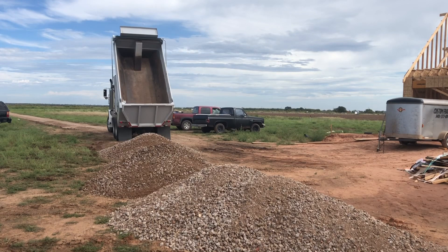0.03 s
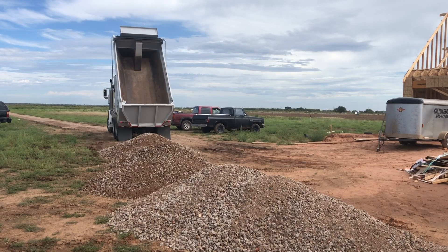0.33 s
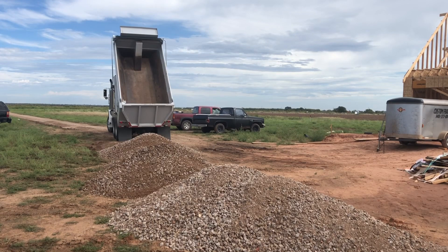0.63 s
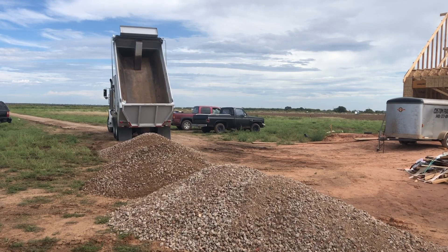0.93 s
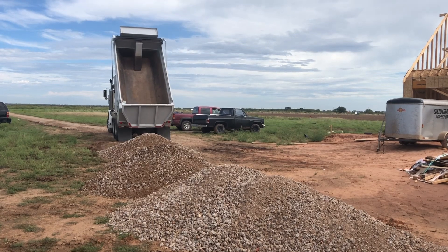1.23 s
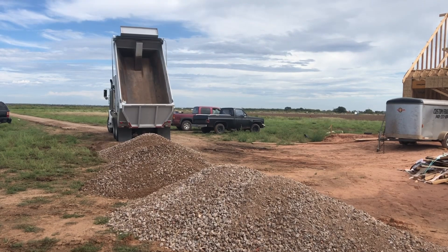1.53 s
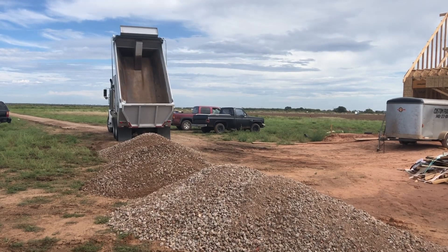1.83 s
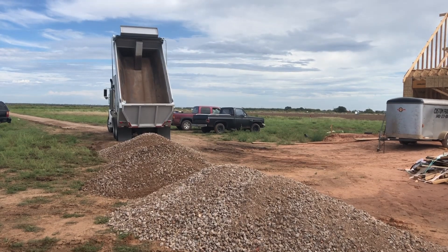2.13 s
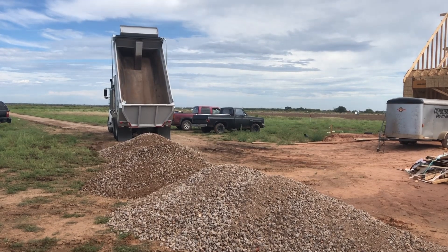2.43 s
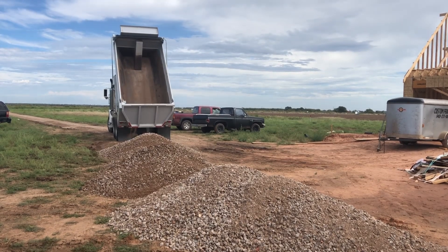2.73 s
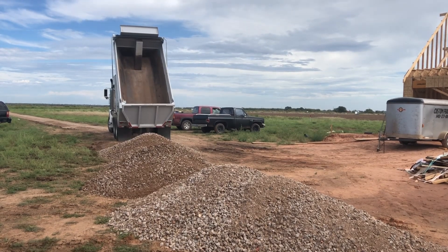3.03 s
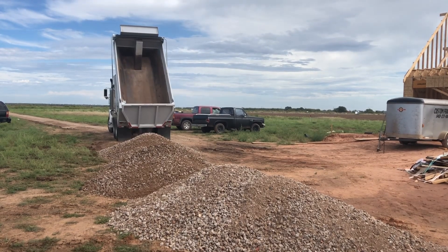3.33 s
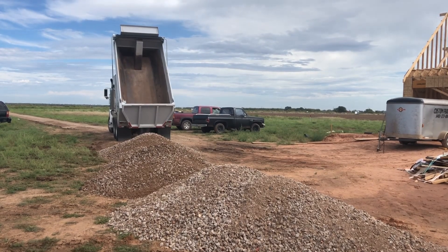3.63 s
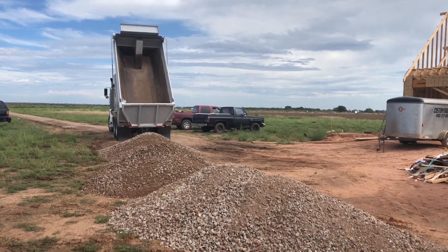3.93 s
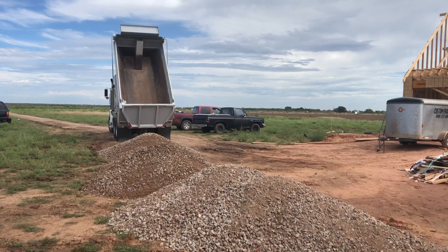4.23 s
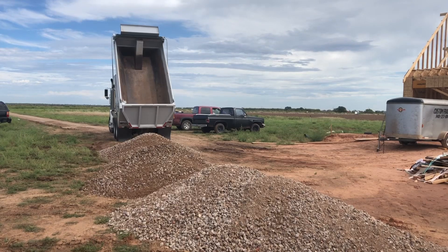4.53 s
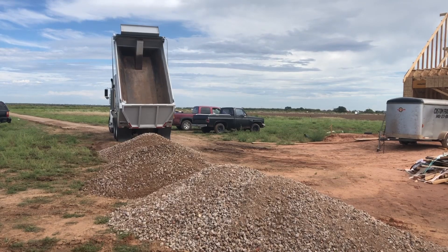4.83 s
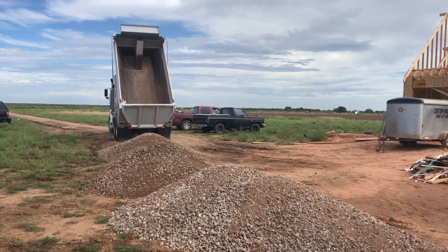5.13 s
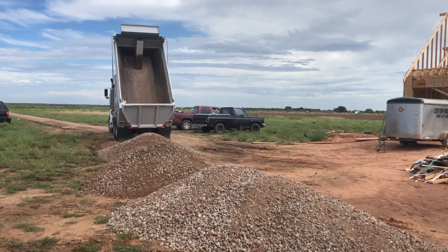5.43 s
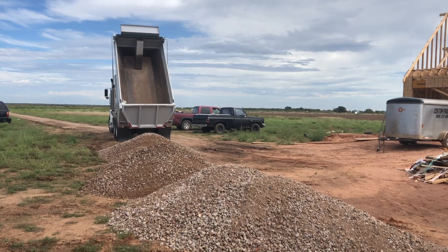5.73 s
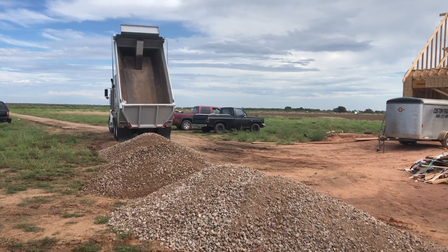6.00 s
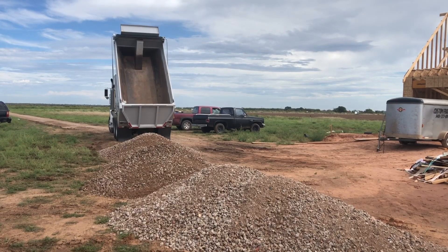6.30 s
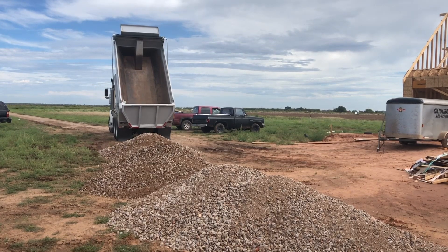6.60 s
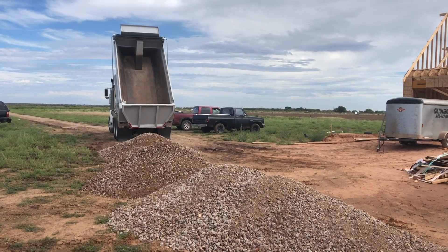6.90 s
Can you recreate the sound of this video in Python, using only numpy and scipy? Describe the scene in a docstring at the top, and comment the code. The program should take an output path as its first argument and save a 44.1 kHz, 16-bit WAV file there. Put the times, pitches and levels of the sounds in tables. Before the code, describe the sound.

Over an idling diesel, a motor spins up and a truck's steel bed booms and buzzes loudly before shuddering to rest.

```python
"""A dump truck idles on an open gravel lot with its steel bed raised. A switch clicks faintly and an electric
vibrator spins up with a whine; the tailgate grates and knocks and its chains clink as the bed starts to sway.
For about four seconds the rotating weight forces the bed at 50 turns a second: it booms, its panels buzz,
and loose steel and grit strike in every turn. Switched off, the motor coasts down; the chains clink again,
the bed shudders and rocks to rest, and a hum fades over the idling diesel."""
import sys
import numpy as np
from scipy import signal
from scipy.fft import rfft, irfft, next_fast_len
from scipy.io import wavfile

SR = 44100
rng = np.random.default_rng(int(sys.argv[2]) if len(sys.argv) > 2 else 0)


def transcribe(u):
    """Save the signal u as a 16-bit wav file named by the first command-line argument.

    u: samples, shape (n,) or (channels, n), limited to [-1, 1]; the rate is SR.
    q: integer samples, one column per channel.
    """
    v = np.clip(np.atleast_2d(u).T, -1, 1)
    q = np.round(v * 32767).astype(np.int16)
    wavfile.write(sys.argv[1], SR, q)


N = 311346
T = np.arange(N) / SR
RUN_HZ = 50.15  # turns per second at full speed
ON_S, SPIN_UP_S, OFF_S = .44, .9, 5.13  # switch-on, length of the run-up, switch-off

# resonances of the bed walls: (f/Hz, width/Hz, lift/dB)
WALL_RESONANCES = [(589.06, 29, -0.5), (1513, 36, 3.5), (1835.6, 82, 5.5), (2351, 227, -2.5),
                   (3116, 51, 5.5), (4119.1, 265, 4), (7409, 200, 2), (9080, 180, 5), (9810, 130, 6)]
# response of the panels to the motor: (level/dB, droop/(dB/Hz) below full speed, waking time/s,
# rise/(dB/s), drop at switch-off/dB, drop time/s, lingering time/s, final fall/(dB/s))
PANEL_RESPONSE = (-26.6, .2, .45, 170, 2, .15, .43, 17)


def motor_hz(ease=2.6, coast_s=2.1):
    """Rotation rate: an eased rise under power, then exponential decay as the rotor coasts."""
    rise = 1 - np.clip(1 - (T - ON_S) / SPIN_UP_S, 0, 1) ** ease
    return RUN_HZ * rise * np.exp(-np.maximum(T - OFF_S, 0) / coast_s)


def in_step(locked_s=1.62, settle_s=.5, unsettle_s=.3):
    """Phase locking: 1 while the steel keeps time with the weight, 0 while it shakes freely."""
    return np.clip(np.minimum(1 + (T - locked_s) / settle_s, 1 - (T - OFF_S) / unsettle_s), 0, 1)


def shaken(response):
    """Driven response: a part's gain wakes, follows the speed, drops at switch-off and dies away."""
    db, droop, wake_s, rise, drop_db, drop_s, linger_s, fall = response
    db = db - droop * (RUN_HZ - motor_hz()) - drop_db * np.clip((T - OFF_S) / drop_s, 0, 1)
    return amp(db - rise * np.maximum(ON_S + wake_s - T, 0) - fall * np.maximum(T - OFF_S - linger_s, 0))


def surge(layer):
    """Slow amplitude modulation: the gain that surges of the shaking give to one layer."""
    # (t/s, half-length/s, panel gain/dB, steel gain/dB, grit gain/dB)
    surges = [(1.398, 0.205, 5, 2, -2), (2.41, 0.26, 1, -0.4, 3.5), (4.25, 0.093, 0, 1, 1.5),
              (4.547, 0.135, -1, 1.5, -2), (5.074, 0.106, -0.5, -0.39, 2.5)]
    column = 2 + ("panels", "steel", "grit").index(layer)
    return amp(sum(row[column] * swell(row[0], row[1]) for row in surges))


def boom(turns, overshoot_db=2, overshoot_s=.53):
    """Forced vibration: the rotating weight drives the whole bed at its own rate and at multiples of it."""
    # response of the bed's swing: columns as in PANEL_RESPONSE
    swing_response = (-9.7, 1.2, .33, 200, 9, .09, .45, 60)
    # second harmonic, strongest near the bed's low modes: (t/s, level/dB)
    overtone = [(.74, -36), (.86, -37.5), (.98, -6.5), (1.24, -12), (1.37, -24), (1.62, -15), (5.15, -16),
                (5.52, -18.5), (5.85, -32.5)]
    # sways that choke it at start and stop: (first t/s, spacing/s, half-width/s, first depth, later depth)
    sways = [(1.055, 0.1564, 0.0202, 0.53, 1), (5.225, 0.1162, 0.025, 0.72, 0.66)]
    angle = 2 * np.pi * turns
    swing = shaken(swing_response) * amp(overshoot_db * swell(ON_S + SPIN_UP_S, overshoot_s))
    choke = sum(swell(s + k * spacing, width) * (later if k else first)
                for s, spacing, width, first, later in sways for k in range(4))
    lead = np.pi * .45 * (1 - in_step())  # the phase leads during the sweep through the low modes
    second = envelope(overtone) * np.maximum(1 - choke, 0) * np.cos(2 * angle + lead)
    third = amp(-20 + .94 * drift(15)) * np.cos(3 * angle - 1.1)
    rock = amp(-26 + 2 * drift(10)) * np.cos(1.5 * angle)  # alternate turns differ
    return np.sqrt(2) * (swing * (np.cos(angle) + third + rock) + second)


def panel_buzz(turns, buzz_db=-.5, drum_db=-6.5, free=.458, tight=.938):
    """Periodic impacts give a line spectrum; off full speed the panels lose step and drum as noise."""
    # buzz partials, half multiples from strikes on every other turn: (multiple of the rate, level/dB)
    partials = [(4, -4.5), (4.5, -10.0), (5, -0.5), (6, -14.5), (6.5, -11.5), (7, -3.0), (8, 0.0),
                (8.5, -8.0), (9, -3.0), (10, -6.5), (10.5, -12.0), (11, -5.5), (11.5, -11.0), (12, -3.0),
                (13, -13.5), (14, -17.5), (16, -12.5), (18, -13.5), (19, -15.0), (20, -14.0), (21, -14.0)]
    # panel resonances that weaken or grow mid-run: (f/Hz, width/Hz, early gain/dB, late gain/dB)
    shifting = [(533, 36.2, 4.5, -5), (424.4, 29, -2, 2), (601, 29.95, -5.5, 0.5), (202, 28, 2, 0.5)]
    # spectrum of the drumming: (f/Hz, level/dB)
    drum_spectrum = [(65, -12), (110, -8), (195, -16), (257, -12.5), (295, -20), (335, -12.5), (419, -9.5),
                     (498, -15), (588, -14), (678, -37.5), (800, -26), (1040, -31), (1760, -120)]
    progress = np.interp(T, (2.4, 3.33), [0, 1])
    lines = np.zeros(N)
    for multiple, db in partials:
        wander = (.231 + .386 * (multiple % 1)) * drift(14)  # half multiples keep step less well
        shift_db = sum(np.exp(-((multiple * RUN_HZ - hz) / width) ** 2 / 2)
                       * (early + (late - early) * progress) for hz, width, early, late in shifting)
        gain = amp(db + shift_db + 1.61 * drift(4))
        lines += gain * np.cos(2 * np.pi * (multiple * turns + rng.random()) + wander)
    pulsing = 1 + .5 * np.cos(4 * np.pi * turns)
    drumming = colour(rng.standard_normal(N) * pulsing, drum_spectrum, WALL_RESONANCES)
    locked = free + (tight - free) * in_step()
    loose = np.sqrt(amp(drum_db) ** 2 + np.maximum(1 - locked ** 2, 0))
    panels = amp(buzz_db) * locked * evened(lines) + loose * drumming
    return shaken(PANEL_RESPONSE) * surge("panels") * panels


def contacts(turns, count, tight_s, loose_s, spread_db, t60, tail, limp=.227):
    """Impact trains: each part cracks and rings once a turn; tight timing gives pitch, jitter noise."""
    out, t = np.zeros(N), np.arange(8192) / SR
    starts, unsettled = np.arange(int(turns[-1])), 1 - in_step()
    for k, jitter_s in enumerate(rng.permutation(np.geomspace(tight_s, loose_s, count))):
        late, size = rng.standard_normal((400, 2))[:len(starts)].T
        s = np.interp(starts + (k + .6 * rng.random()) / count, turns, T)  # each at its own angle
        s += (jitter_s + .001 * np.interp(s, T, unsettled)) * late
        alternation = 1 + limp * (-1) ** (starts + k)
        strength = amp(spread_db * np.clip(size, -2, 2)) * alternation
        blows = np.bincount(np.clip(s * SR, 0, N).astype(int), strength, N + 1)[:N]
        impact = rng.standard_normal(len(t)) * (np.exp(-t / .000379) + tail * amp(-60 * t / t60))
        out += signal.oaconvolve(blows, impact)[:N]
    return out


def rattle(turns, steel_db=1.5, grit_db=3, dull_hz=2200, soft=.723):
    """Impact excitation: loose steel chatters, duller when out of step, and grit dances on the bed."""
    # spectra of the steel and grit impacts: (f/Hz, level/dB)
    steel_spectrum = [(320, -29.5), (550, -5), (597, -4.5), (687, -8), (819, -8.5), (1160, -10),
                      (1500, -8.5), (1630, -14.5), (1790, -11.5), (2010, -14.5), (2350, -7.5),
                      (2580, -14.5), (4110, -19), (4840, -22), (9000, -37), (11700, -56.5), (19800, -120)]
    grit_spectrum = [(2650, -26), (4500, -8), (5710, -0.5), (6050, -1.5), (7600, 1), (8340, -3),
                     (8930, 0.5), (9450, -10.5), (10100, -6), (12600, -12.5), (13200, -22.5), (13900, -17),
                     (15600, -12.5)]
    # their responses to the motor: columns as in PANEL_RESPONSE
    steel_response = (-32, .5, 0.3487, 89.5, 5, 0.58, 0.58, 82.5)
    grit_response = (-44, 2.5, 0.8866, 44.5, 7, 0.04, 1.02, 28)
    steel = contacts(turns, count=10, tight_s=.00009, loose_s=.003, spread_db=3, t60=.203, tail=.582)
    steel = colour(steel, steel_spectrum, WALL_RESONANCES)
    hardness = soft + (1 - soft) * in_step()
    steel = hardness * steel + (1 - hardness) * signal.filtfilt(*signal.butter(2, dull_hz, fs=SR), steel)
    grit = contacts(turns, count=6, tight_s=.000008, loose_s=.0005, spread_db=2.5, t60=.085, tail=.576)
    grit = colour(grit, grit_spectrum, WALL_RESONANCES)
    steel *= amp(steel_db + .5 * drift(11)) * shaken(steel_response) * surge("steel")
    grit *= amp(grit_db + .636 * drift(14)) * shaken(grit_response) * surge("grit")
    return steel + grit


def thin_ring(ring_db=-33, follow=.883):
    """Narrow-band noise: a thin, flickering ring near 14 kHz that grows with the panels' drumming."""
    spectrum = [(12800, -70.5), (13700, -22), (14020, 2), (14320, -12.5), (15200, -73.5)]
    band = colour(rng.standard_normal(N), spectrum)
    return amp(ring_db + 2 * drift(45)) * shaken(PANEL_RESPONSE) ** follow * band


def shudder(shudder_db=-28, after_s=.394, half_s=.234):
    """Passage through resonance: the slowing weight stirs the bed's low modes into a short rumble."""
    spectrum = [(20, -35), (42, -9.5), (60, -17), (88, 4.5), (130, .5), (200, -18), (500, -23),
                (1500, -53.5)]
    return amp(shudder_db) * swell(OFF_S + after_s, half_s) * colour(rng.standard_normal(N), spectrum)


def switch_and_chains(hit_db=-5, jingle_db=-36, follow=.348, hit_s=.009128, ring_s=.109):
    """Impact transients: the motor's switch clicks faintly, then the chains clink and their links ring."""
    # the switch click (first row), then the chain clinks: (t/s, relative level/dB)
    impacts = [(0.4537, -48), (0.8407, -32), (0.8645, -29.5), (0.9107, -34.5), (0.9588, -35), (0.983, -23),
               (1.0091, -29), (1.043, -30.5), (1.1997, -41), (5.3778, -35.5), (5.4012, -31), (5.429, -34.5),
               (5.5929, -38.5), (5.6128, -38.5), (5.6445, -29.5), (5.666, -32), (5.694, -32)]
    # spectrum of an impact: (f/Hz, level/dB)
    hit_spectrum = [(500, -21), (1200, -22.5), (2500, -4), (4500, -5), (5800, -1.5), (7400, -3.5),
                    (8600, -20.5), (12000, -23.5), (15500, -28)]
    # modes of the links: (f/Hz, level/dB)
    link_modes = [(2710, -6), (3268, 0), (4052, -2), (4344, -5), (5523, -8), (6245, -8), (7068, -8),
                  (8360, -7), (9641, -7)]
    hits, energy, t = np.zeros(N), np.zeros(N), np.arange(SR // 2) / SR
    decay = np.exp(-t / hit_s) + .215 * np.exp(-t / .082)
    for s, db in impacts:
        add(hits, s, amp(db + hit_db) * colour(rng.standard_normal(len(t)), hit_spectrum) * decay)
        add(energy, s, (amp(follow * db) * np.exp(-t / ring_s)) ** 2)
    links = sum(amp(db + 2 * drift(13)) * np.cos(2 * np.pi * hz * T + drift(25)) for hz, db in link_modes)
    return hits + amp(jingle_db) * np.sqrt(energy) * (motor_hz() / RUN_HZ) ** 2 * evened(links)


def hinge(hinge_db=-1, arch=.56):
    """Friction excitation: the hinge's broad rasp drives three narrow resonances of the tailgate."""
    # strokes of the swinging tailgate: (t/s, length/s, relative level/dB)
    grates = [(0.679, 0.485, -37.5), (5.299, 0.606, -44.5), (5.96, 0.292, -49), (6.315, 0.1, -47)]
    rasp = [(400, -40), (1300, -10.5), (2200, -17), (4500, -24.5), (6000, -42)]
    resonances = [(1503, 61, 7.73), (1862, 80, 15.5), (2178, 110, 10.2)]
    grate = colour(rng.standard_normal(N), rasp, resonances)
    strokes = sum(amp(db) * abs(np.sin(np.pi * np.clip((T - s) / length, 0, 1))) ** arch
                  for s, length, db in grates)
    return amp(hinge_db + 2 * drift(50)) * strokes * grate


def knocks(thud_db=-2, clatter_db=-3, rock_s=.288):
    """Damped free vibration: bed and tailgate bump as they start to sway and as they rock to rest."""
    # tailgate knocks: (t/s, thud level/dB, clatter level/dB), levels relative
    tailgate_knocks = [(0.679, -48.5, -48), (.715, -52, -39), (.768, -29, -37), (.84, -31.5, -27.5),
                       (.9, -29.5, -29.5), (.965, -21, -24), (5.645, -32.5, -31.5)]
    # the two bumps in each rock: (first t/s, thud level/dB, clatter level/dB, loss per rock/dB)
    bumps = [(5.79, -17.5, -40.5, 1.5), (5.904, -13.5, -42, 3.5)]
    # low modes of the bed: (f/Hz, level/dB, t60/s)
    bed_modes = [(41.44, -15, 0.78), (86.82, 1, 0.32), (97.43, -0.5, 0.256), (128.92, -8, 0.71),
                 (223.6, -12, 0.257)]
    spectrum = [(150, -20.5), (400, 3), (1200, 2), (1900, -5.5), (2600, -9.5), (8000, -50.5)]
    out, t = np.zeros(N), np.arange(SR // 2) / SR
    rocking = [(s + k * rock_s, low - k * loss, high - k * loss)
               for s, low, high, loss in bumps for k in range(4)]
    for s, low_db, high_db in tailgate_knocks + rocking:
        clatter = colour(rng.standard_normal(len(t)), spectrum)
        clatter *= np.exp(-t / .0613) * (1 - np.exp(-t / .0039))
        thud = ring(bed_modes, t) * (1 - np.exp(-t / .0103))
        add(out, s, amp(low_db + thud_db) * thud + amp(high_db + clatter_db) * clatter)
    return out


def whine(turns, cycles_per_turn=32, whine_db=-44, housing_hz=790):
    """Swept excitation: the starting motor's rough, rising tones peak at its housing's resonance."""
    angle = 2 * np.pi * cycles_per_turn * turns
    tone = np.cos(angle + drift(220)) + .42 * np.cos(1.3 * angle + 2 * drift(250))
    tone += .28 * np.cos(2 * angle + drift(180)) + .76 * np.cos(2 * angle / 3 + 2 * drift(200))
    tone *= amp(whine_db + 2.86 * drift(100.93)) * swell(ON_S + .168, half_s=.129)
    return tone + 2.6 * signal.lfilter(*signal.iirpeak(housing_hz, Q=14, fs=SR), tone)


def engine(firing_hz=35.56, engine_db=2, noise_db=-43):
    """Periodic combustion: the idling diesel gives firing tones over a wash of broadband noise."""
    # engine orders: (multiple of the firing rate, relative level/dB)
    orders = [(1, -62.5), (2, -43.5), (2.5, -56), (3, -47.5), (3.5, -58.5), (4, -68)]
    # spectrum of combustion and fan noise: (f/Hz, level/dB)
    idle_spectrum = [(20, -42), (35, -24.5), (55, -1.5), (91, -2), (122, -10), (199, -19), (520, -20),
                     (632, -25.5), (946, -25), (1620, -31.5), (1850, -28), (2360, -35), (3180, -35.5),
                     (4630, -42), (15600, -48.5)]
    firings = np.cumsum(firing_hz * (1 + .00733 * drift(8))) / SR
    tones = sum(amp(db + drift(24)) * np.cos(2 * np.pi * (k * firings + rng.random())) for k, db in orders)
    noise = colour(rng.standard_normal(N), idle_spectrum) * amp(noise_db + .75 * drift(60))
    return amp(engine_db) * (np.sqrt(2) * tones + noise)


def pump_hum(low_hz=150.86, high_hz=222):
    """Exponential growth and decay: a pump's two-tone hum builds during the run and fades after it."""
    # crest of the hum: (t/s after switch-off, level/dB, rise/(dB/s), fall/(dB/s))
    crest = (0.28, -29, 7.5, 9.5)
    lag_s, top_db, rise, fall = crest
    top_s = OFF_S + lag_s
    hum = np.cos(2 * np.pi * low_hz * T + .28 * drift(15))
    hum += .254 * np.cos(2 * np.pi * high_hz * T + drift(11))
    db = top_db - np.maximum(rise * (top_s - T), fall * (T - top_s))
    return np.sqrt(2) * amp(db + 2.05 * drift(15)) * hum


def amp(db):
    """Amplitude ratio of a level in decibels."""
    return 10 ** (np.asarray(db) / 20)


def evened(x):
    """Normalisation to rms 1."""
    return x / np.sqrt(np.mean(x ** 2) + 1e-20)


def envelope(points):
    """Gain through (t/s, level/dB) points, decaying exponentially outside their span."""
    s, db = np.transpose(points)
    outside = np.maximum(s[0] - T, 0) + np.maximum(T - s[-1], 0)
    return amp(np.interp(T, s, db) - 200 * outside)


def swell(s, half_s):
    """Gaussian pulse of height 1."""
    return np.exp(-((T - s) / half_s) ** 2)


def drift(per_s):
    """Random modulation of rms 1, with per_s new values a second."""
    knots = rng.standard_normal(4096)
    return evened(np.interp(T * per_s, np.arange(len(knots)), knots))


def colour(x, points, peaks=()):
    """Filtering by a spectrum (f/Hz, level/dB) and resonances (f/Hz, width/Hz, lift/dB), to rms 1."""
    size = next_fast_len(len(x))
    hz = np.fft.rfftfreq(size, 1 / SR)
    point_hz, point_db = np.transpose(points)
    db = np.interp(np.log(hz + 1), np.log(point_hz + 1), point_db)
    db += sum(lift / (1 + (2 * (hz - f) / width) ** 2) for f, width, lift in peaks)
    return evened(irfft(rfft(x, size) * amp(db), size)[:len(x)])


def ring(modes, t):
    """Modal decay: the damped sines of a struck object, each slightly detuned at random."""
    return sum(amp(db - 60 * t / t60) * np.sin(2 * np.pi * hz * t * (1 + .0015 * rng.standard_normal()))
               for hz, db, t60 in modes)


def add(mix, s, sound):
    """Superposition of a sound on the mix from time s."""
    part = mix[round(s * SR):][:len(sound)]
    part += sound[:len(part)]


def scene():
    """Superposition: one motor speed drives the bed, and the truck idles underneath."""
    turns = np.cumsum(motor_hz() * (1 + .0004 * drift(6))) / SR
    bed = boom(turns) + panel_buzz(turns) + rattle(turns) + thin_ring() + shudder()
    return (bed + switch_and_chains() + hinge() + knocks() + whine(turns) + engine() + pump_hum())[None]


def record(dry):
    """Clipping at full scale, then low-pass filtering at 15.7 kHz."""
    lowpass = signal.firwin(511, 15700, window=("kaiser", 9), fs=SR)
    return signal.oaconvolve(np.clip(dry, -1, 1), lowpass[None], "same")


dry = scene()
out = record(dry)
transcribe(out)
```